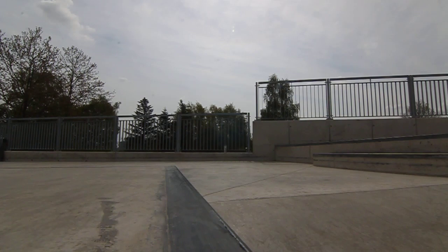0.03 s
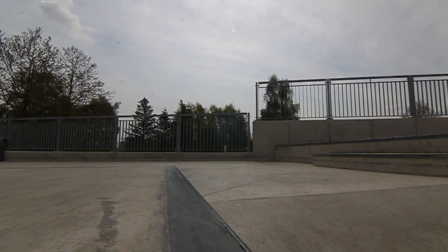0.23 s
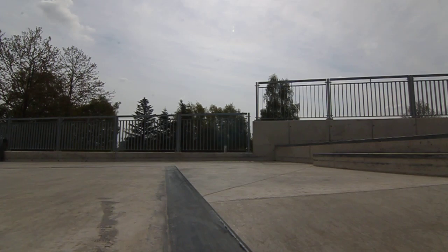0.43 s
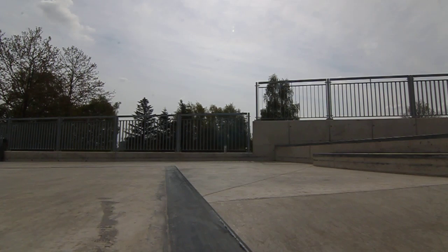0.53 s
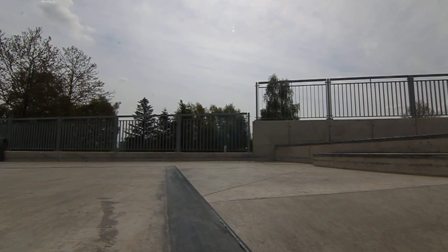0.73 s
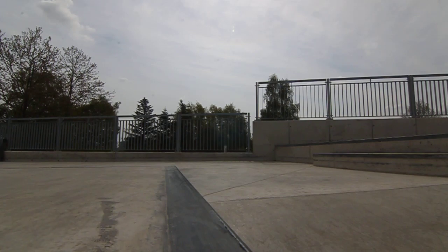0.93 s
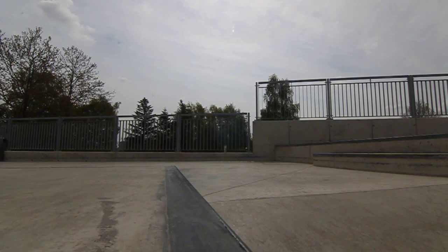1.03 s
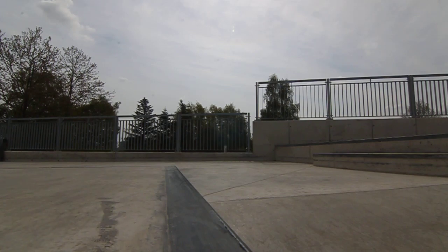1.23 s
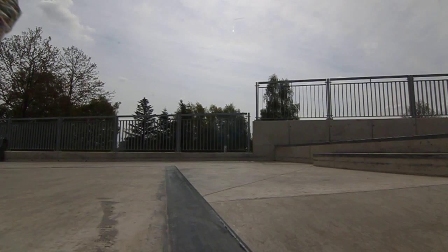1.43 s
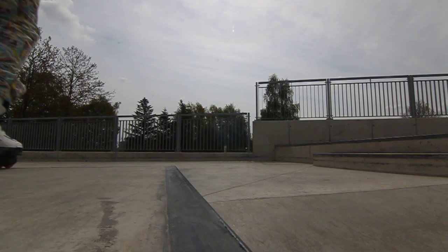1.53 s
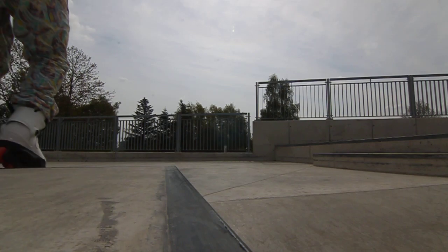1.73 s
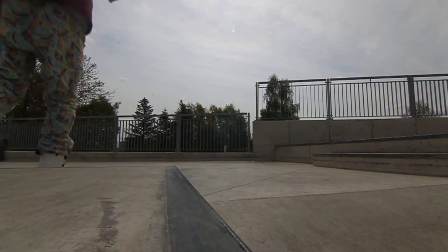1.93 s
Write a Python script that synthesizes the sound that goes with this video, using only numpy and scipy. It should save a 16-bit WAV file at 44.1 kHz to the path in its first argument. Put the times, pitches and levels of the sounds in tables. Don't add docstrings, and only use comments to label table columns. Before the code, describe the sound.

Gritty inline skate wheels on concrete, a joint bump, sharp takeoff knocks, a loud clipped landing and short squeak

```python
import sys
import numpy as np
from scipy import signal
from scipy.fft import rfft, irfft
from scipy.io import wavfile
from scipy.ndimage import uniform_filter1d

SR = 44100
rng = np.random.default_rng(int(sys.argv[2]) if len(sys.argv) > 2 else 0)


def field_ratio(decibels):
    return 10 ** (np.asarray(decibels, dtype=float) / 20)


def pcm_store(signal):
    levels = np.round(np.clip(np.atleast_2d(signal), -1, 1) * 32767)
    wavfile.write(sys.argv[1], SR, levels.astype(np.int16).T)


N = 88200


def level(x, db=0):
    return x * field_ratio(db) / np.sqrt(np.mean(x ** 2))


def colour(x, points):
    hz, db = np.array(points).T
    f = np.maximum(np.fft.rfftfreq(len(x), 1 / SR), 1)
    gain_db = np.interp(np.log(f), np.log(hz), db, left=-80, right=-80)
    return irfft(rfft(x) * field_ratio(gain_db), len(x))


def highpass(x, hz):
    return signal.lfilter(*signal.butter(2, hz, "high", fs=SR), x)


def ring(x, hz, t60_s):
    r = np.exp(-np.log(1000) / (t60_s * SR))
    w = 2 * np.pi * hz / SR
    return signal.lfilter([np.sqrt(1 - r * r) * np.sin(w) * 2], [1, -2 * r * np.cos(w), r * r], x)


def walk(rate_hz):
    k = int(SR / rate_hz)
    steps = np.repeat(rng.standard_normal(N // k + 1), k)
    smooth = uniform_filter1d(uniform_filter1d(steps, k), k)
    return level(smooth[:N])


def add(out, start_s, x):
    i = int(start_s * SR)
    out[i:i + len(x)] += x[:N - i]


def bump(t, centre_s, width_s, hz, db):
    u = t - centre_s
    return field_ratio(db) * np.exp(-(u / width_s) ** 2) * np.sin(2 * np.pi * hz * u)


def grit(per_s, scatter_db):
    hit = rng.random(N) < per_s / SR
    size = field_ratio(scatter_db * rng.exponential(1, N)) * rng.standard_normal(N)
    return level(hit * size) + 1.1 * rng.standard_normal(N)


def tick(hz, t60_s, octaves, strike=3):
    u = np.arange(1500) / SR
    x = (rng.standard_normal(len(u)) + strike * (u == 0)) * np.exp(-np.log(1000) * u / t60_s)
    half = 2 ** (octaves / 2)
    band_hz = [hz / half, min(hz * half, .45 * SR)]
    y = signal.lfilter(*signal.butter(2, band_hz, "band", fs=SR), x)
    return y / np.abs(y).max()


# time in seconds, rolling level in dB, sideways scrub level in dB.
ROLL_LEVELS = [(.04, -33.5, -44.5), (.14, -32.5, -44), (.16, -33.5, -39), (.295, -31.5, -41.5),
               (0.308, -33.5, -44.5), (.5, -33, -51), (.59, -34, -45), (.67, -34.5, -51.5),
               (.92, -32.5, -50), (1.15, -33, -48.5), (1.31, -32.5, -49), (1.37, -35.5, -55),
               (1.42, -38, -69), (1.56, -36, -78), (1.66, -37.5, -50.5), (1.8, -44, -57), (1.93, -39, -61),
               (2.0, -37, -54)]
# frequency in Hz, density in dB per Hz.
WHEEL_SPECTRUM = [(88, -12.5), (745, -4), (998, 0), (1300, -3.5), (1900, -10.5), (3300, -16.5),
                  (5500, -30.5), (10200, -38.5), (16000, -38)]
SCRUB_SPECTRUM = [(1500, 13.5), (3000, 8), (5000, 5.5), (7000, 1.5), (10000, 1), (14000, -1.5), (16000, -3)]


def rolling(t):
    s, roll_db, scrub_db = np.array(ROLL_LEVELS).T
    wheels = level(colour(grit(2500, 1.5), WHEEL_SPECTRUM))
    scrub = level(colour(grit(5100, 1.8), SCRUB_SPECTRUM))
    wheels_db = np.interp(t, s, roll_db) + 2.5 + 0.88 * walk(45.32)
    hiss_db = np.interp(t, s, scrub_db) + 4.0 + 1.0 * walk(31.7)
    return wheels * field_ratio(wheels_db) + scrub * field_ratio(hiss_db)


# frequency in Hz, density in dB per Hz.
AIR_SPECTRUM = [(15, -45), (25, -11), (54, 14), (108, 8.5), (146, 9.5), (237, 7), (348, -4), (400, -6),
                (520, 3), (880, -120)]


def air(t):
    fade_db_per_s = -3
    bed = level(colour(rng.standard_normal(N), AIR_SPECTRUM), -43.5)
    puff = bump(t, 1.962, 0.0081, hz=120, db=-29.5)
    return bed * field_ratio(0.5 * walk(6.7) + fade_db_per_s * (t - 0.84)) + puff


# start in seconds, level in dB, centre in Hz, t60 in seconds, width in octaves.
LONE_TICKS = [(.539, -40, 5600, .008, .5), (.552, -36, 5800, .01, .8), (.578, -41, 5463, .01, .85),
              (0.6977, -25.5, 8000, 0.0076, 1.8), (0.93, -41, 7387, .012, 1.5),
              (.7445, -47, 9720, .007, 1.5), (.7826, -27.5, 3480, 0.013, 1.1), (.8475, -42, 11500, .01, .5),
              (0.8526, -26, 6500, 0.0044, 1.2), (.8533, -29, 10300, .02, 0.27),
              (.8534, -36, 12800, .035, .08), (.8625, -51, 12500, .006, .5), (0.95, -41, 8000, .006, .8),
              (1.3225, -30, 11000, 0.016, 1), (1.3487, -23, 5450, 0.03, 1.26), (1.349, -33, 12000, .02, .8),
              (1.3525, -31.5, 7460, 0.032, 1.7), (1.3561, -25.5, 2400, .02, .8),
              (1.5672, -31.5, 3460, .012, 1), (1.5673, -36.5, 12000, 0.011, 0.54),
              (1.621, -15, 5280, 0.023, .5), (1.6217, -25, 11000, .02, 1), (1.6795, -32, 5556, .008, 1.8),
              (1.681, -37, 9060, .17, 0.28), (1.7231, -27.5, 6260, 0.007, 0.21),
              (1.756, -41, 4200, .013, .23), (1.807, -52, 6000, .006, 1), (1.817, -44, 6500, .006, 1.1),
              (1.9444, -40, 2778, .014, .77)]


def ticks():
    out = np.zeros(N)
    for s, db, hz, t60_s, octaves in LONE_TICKS:
        add(out, s, field_ratio(db) * 2 * tick(hz, t60_s, octaves))
    return out


# start in seconds, crack level in dB, contact in ms, boot thump level in dB,
# brightness in dB per octave.
BLOWS = [(.6940, -17.5, 2.7, -45, -3), (.6978, -17.5, 2.2, -27, -2.5), (1.3220, -13, 8.9, -14.5, 1.5),
         (1.3482, -8.5, 1.9, -5.5, -1), (1.6208, -4.5, 5.2, -17.5, 2), (1.7232, -10.5, 1.5, -23, 1),
         (1.6365, -24, 4, -35, -3), (1.6525, -24, 3, -38, -3), (1.751, -33, 2, -41, -5),
         (1.756, -34.5, 2.5, -46, -0.5), (1.787, -34, 7.8, -41, -3), (1.957, -33, 5, -39, -2)]
# frequency in Hz, level in dB.
JOINT = [(1030, -0.5), (1300, -2), (1860, -11), (2710, -4), (3270, -5), (4200, -6), (6210, -10),
         (7810, -21), (11000, -20)]
TOE = [(1420, 1), (2150, 2), (2790, 6), (3300, 4.5), (3750, 4), (4470, 4), (4790, 1), (8110, -21),
       (11500, -11)]
HEEL = [(1370, -6), (2440, 3.5), (3170, 0.5), (4190, 1.5), (5200, -5.5), (6850, -1.5), (7900, -7),
        (9640, -22), (11600, -14)]
SLAM = [(365, -5.5), (756, 1.5), (1370, 3), (1840, -0.5), (2570, 4.5), (3550, -0.5), (4290, -21),
        (5200, -2), (5680, -2), (7360, -10), (8680, -19), (11500, -20)]
SLAP = [(398, 5), (830, 0.5), (1107, 2), (1420, -0.5), (2060, 0), (2830, 1), (3500, 2), (4720, -1.5),
        (5600, -14), (6300, -8), (9000, -12)]
LIGHT = [(383, -11), (535, -30), (748, 1), (1000, 0), (1374, 8), (2170, -10), (2740, 0), (3600, 0),
         (4420, 4), (5720, 0.5), (6660, -1), (8600, -15), (11400, -9), (14500, -25)]
HARD_MODES = [JOINT, JOINT, TOE, HEEL, SLAM, SLAP]
# frequency in Hz, level in dB, t60 in seconds.
BOOT_MODES = [(131, -33, 0.094), (225, 1, 0.012), (291, 11.5, 0.04), (400, 5.5, 0.027)]


def frame_crack(u, contact_ms, tilt_db, modes, hard):
    slam = modes is SLAM
    chance = rng.standard_normal((3, len(u)))
    strike = field_ratio(5) * np.exp(-((u - .0007) / .00004) ** 2)
    if slam:
        second_wheel_s, push_s = .0021, .0001
        strike = field_ratio(3) * sum(np.exp(-((u - .0004 - n * second_wheel_s) / push_s) ** 2) / (1 + n / 2)
                              for n in range(2))
    contact_gain = field_ratio(-12 * hard)
    treble_fade = .15 if slam else .38
    detune = 0 if hard else .03
    tail = contact_gain * chance[1] * np.exp(-np.log(1000) * u / .025)
    crack = 0
    for k, (hz, db) in enumerate(modes):
        x = u / (contact_ms / 1000) * (hz / 1400) ** treble_fade
        contact = contact_gain * chance[0] * np.minimum(u / 0.00023, 1) * np.exp(-x ** 2)
        gain = field_ratio(db + tilt_db * np.log2(hz / 1400)) * (-1) ** k
        crack = crack + gain * ring(strike + contact + tail, hz * (1 + detune * chance[2, k]), 11 / hz)
    crack = highpass(crack, 220)
    return crack / np.abs(crack).max()


def boot_thump(u):
    lag_s, push_s = 0.00292, 0.00065
    push = np.sin(np.pi * np.clip((u - lag_s) / push_s, 0, 1)) ** 2
    thump = -sum(field_ratio(db) * ring(push, hz, t60_s) for hz, db, t60_s in BOOT_MODES)
    thump = highpass(thump, 130)
    return thump / np.abs(thump).max()


def knocks():
    out, u = np.zeros(N), np.arange(4000) / SR
    for n, (s, crack_db, contact_ms, thump_db, tilt_db) in enumerate(BLOWS):
        hard = n < len(HARD_MODES)
        modes = HARD_MODES[n] if hard else LIGHT
        crack = frame_crack(u, contact_ms, tilt_db, modes, hard)
        add(out, s, field_ratio(crack_db) * 2.09 * crack + field_ratio(thump_db) * boot_thump(u))
    return out


def joint(t):
    return bump(t, .699, 0.004, hz=226, db=-17.5)


# start in seconds, end in seconds, centre in Hz.
SLIDE_SPANS = [(.725, .76, 5000), (.855, .875, 6000), (1.575, 1.62, 4000), (1.679, 1.704, 6000),
               (1.704, 1.74, 5500), (1.786, 1.80, 5000), (1.943, 1.97, 3500)]
SLIDE_LEVELS_DB = [-36.5, -39, -44, -42.5, -42, -41.5, -50.5]


def slides(t):
    out = np.zeros(N)
    for (start_s, end_s, hz), db in zip(SLIDE_SPANS, SLIDE_LEVELS_DB):
        spectrum = [(hz / 4, -12), (hz / 2, -2), (hz, 0), (hz * 2, -8), (16500, -14)]
        hiss = level(colour(grit(5000, 2), spectrum))
        rise_s = .02 if end_s < 1 else .002
        rise = np.clip((t - start_s) / rise_s, 0, 1)
        release = np.clip((end_s - t) / (3 * rise_s) + 1, 0, 1)
        sag = field_ratio(-60 * (t - start_s).clip(0))
        out += field_ratio(db) * hiss * rise * release * sag
    return out


# start in seconds, level in dB.
BEARING_TICKS = [(1.0646, -25.5), (1.0688, -36), (1.0746, -32), (1.0795, -35), (1.0844, -30), (1.0877, -34),
                 (1.0918, -33), (1.0958, -32), (1.0986, -35), (1.1019, -27.5), (1.1056, -32), (1.1088, -33),
                 (1.1128, -34), (1.1168, -32), (1.1218, -34), (1.1268, -30.5), (1.1318, -36), (1.1371, -32),
                 (1.1435, -38), (1.1538, -34), (1.1569, -42)]


def chatter():
    out = np.zeros(N)
    for s, db in BEARING_TICKS:
        add(out, s, field_ratio(db) * tick(10340, .003, 0.43, strike=8))
    return out


# start in seconds, from Hz, to Hz, fall in ms, level in dB.
SLAB_BENDS = [
    (1.3490, 3200, 330, 1.6, -12),
    (1.6210, 1250, 700, .8, -2),
    (1.7240, 1700, 480, 1.3, -13),
]


def bends():
    out, u = np.zeros(N), np.arange(1200) / SR
    for s, from_hz, to_hz, fall_ms, db in SLAB_BENDS:
        hz = to_hz + (from_hz - to_hz) * np.exp(-u / (fall_ms / 1000))
        phase = 2 * np.pi * np.cumsum(hz) / SR
        add(out, s, field_ratio(db) * np.sin(phase) * np.minimum(u / 0.00028, 1) * np.exp(-(u / .0034) ** 2))
    return out


# start in seconds, end in seconds, clicks per second, every second click in dB.
STICK_SLIPS = [
    (1.570, 1.619, 370, -2),
]
# level in dB, centre in Hz, width in octaves.
STICK_SLIP_RINGS = [
    [(-35.5, 13000, 0.5), (-27.5, 1850, 1.3)],
]


def rattles():
    out = np.zeros(N)
    for (start_s, end_s, per_s, weak_db), rings in zip(STICK_SLIPS, STICK_SLIP_RINGS):
        for k in range(int((end_s - start_s) * per_s) + 1):
            time_jitter, level_jitter = rng.standard_normal(2)
            click = sum(field_ratio(db) * tick(hz, .009, octaves) for db, hz, octaves in rings)
            click_db = weak_db * (k % 2) + 1.5 * level_jitter
            add(out, start_s + (k + .08 * time_jitter) / per_s, field_ratio(click_db) * click)
    return out


# time in seconds, pitch in Hz, level in dB.
SQUEAK_PATH = [(1.678, 3600, -52), (1.681, 3500, -42), (1.703, 3400, -47), (1.707, 3800, -33),
               (1.714, 4300, -31), (1.717, 2900, -35), (1.723, 3800, -31), (1.733, 2800, -38),
               (1.738, 2700, -60)]


def squeak(t):
    s, hz, db = np.array(SQUEAK_PATH).T
    pitch_hz = np.interp(t, s, hz) * (1 + .05 * walk(2500))
    phase = 2 * np.pi * np.cumsum(pitch_hz) / SR
    tone = (np.sin(phase) + field_ratio(-15) * np.sin(2 * phase)) * (1 + .5 * walk(900))
    tone *= field_ratio(np.interp(t, s, db, left=-120, right=-120))
    side = level(ring(rng.standard_normal(N), 5500, .006), -44) * (t > s[0]) * (t < s[-1])
    return field_ratio(3.5) * (side + tone)


def scene():
    t = np.arange(N) / SR
    ride = rolling(t) + air(t) + ticks() + knocks() + joint(t)
    return (ride + slides(t) + chatter() + bends() + rattles() + squeak(t))[None]


def band_limit(x):
    return signal.sosfilt(signal.butter(12, 16510, fs=SR, output="sos"), x)


def record(dry):
    start_s, clip = .0362, .72
    on = np.arange(N) >= start_s * SR
    mic = signal.sosfilt(signal.butter(2, 44, "high", fs=SR, output="sos"), dry)
    hard = np.clip(mic * on, -clip, clip)
    mix = signal.sosfiltfilt(signal.butter(8, 15500, fs=SR, output="sos"), hard)
    return band_limit(mix)


dry = scene()
out = record(dry)
pcm_store(out)
```